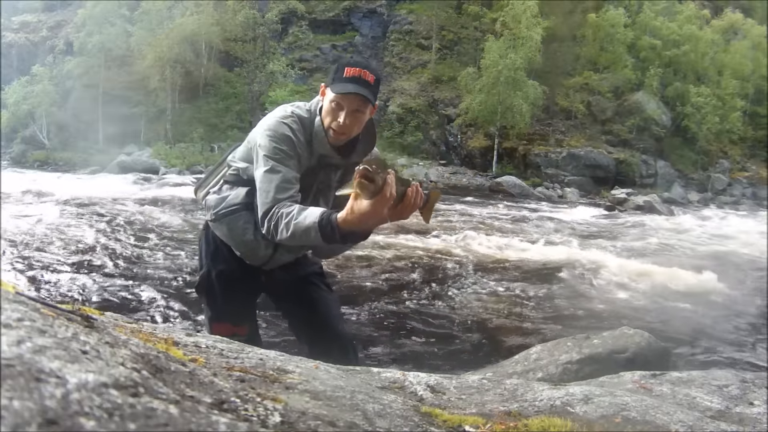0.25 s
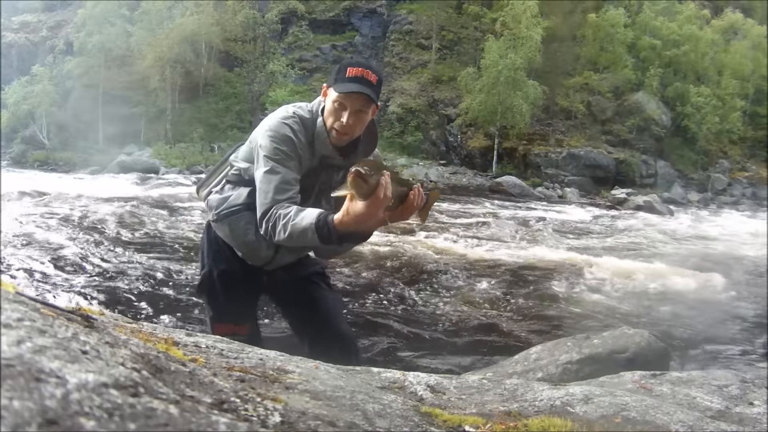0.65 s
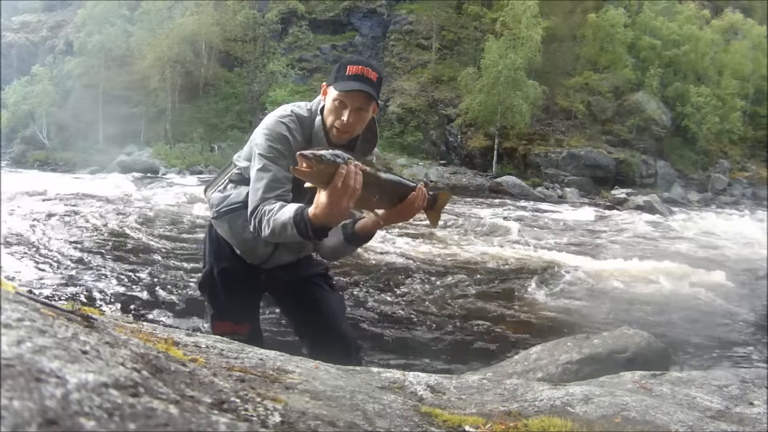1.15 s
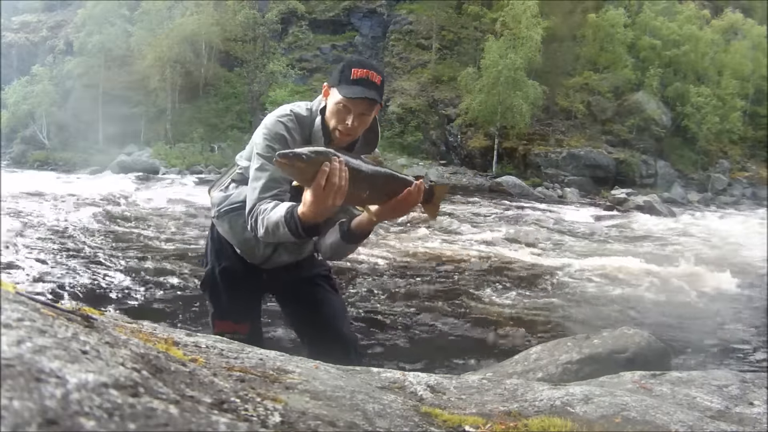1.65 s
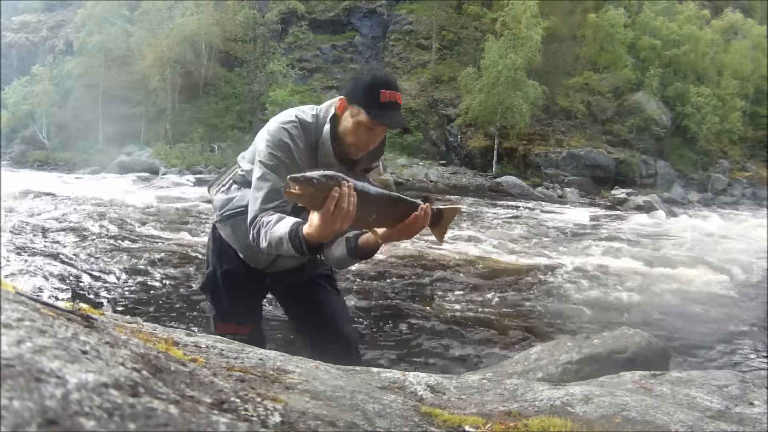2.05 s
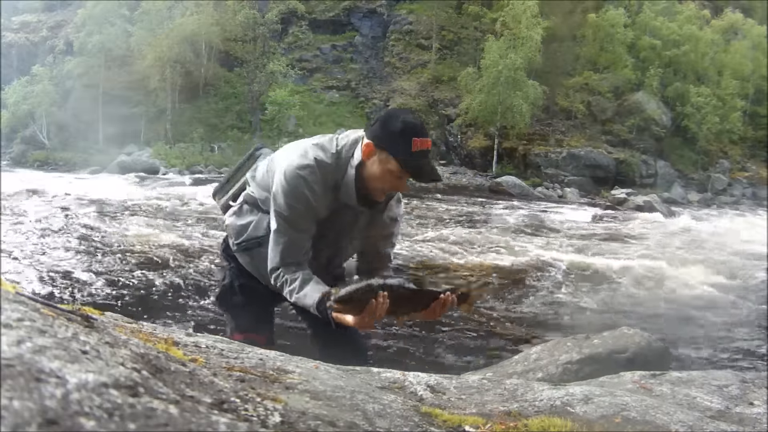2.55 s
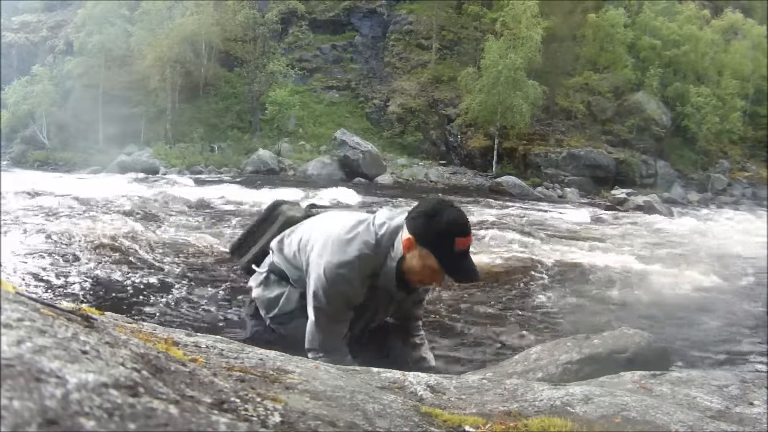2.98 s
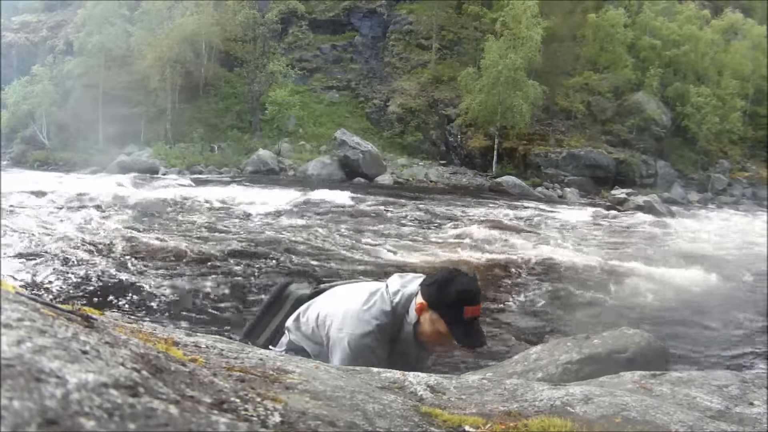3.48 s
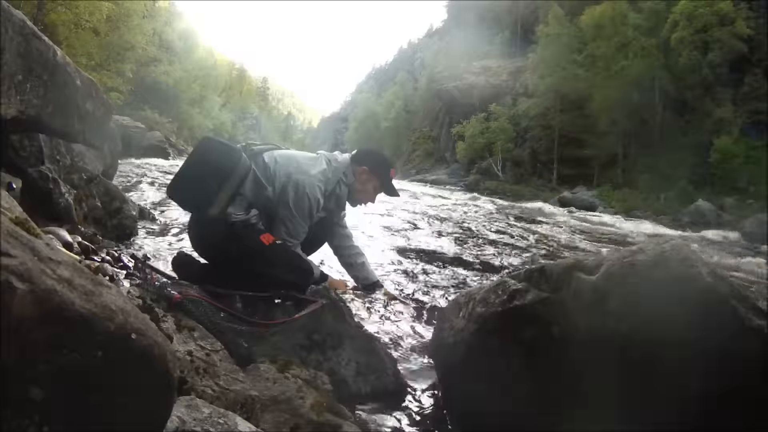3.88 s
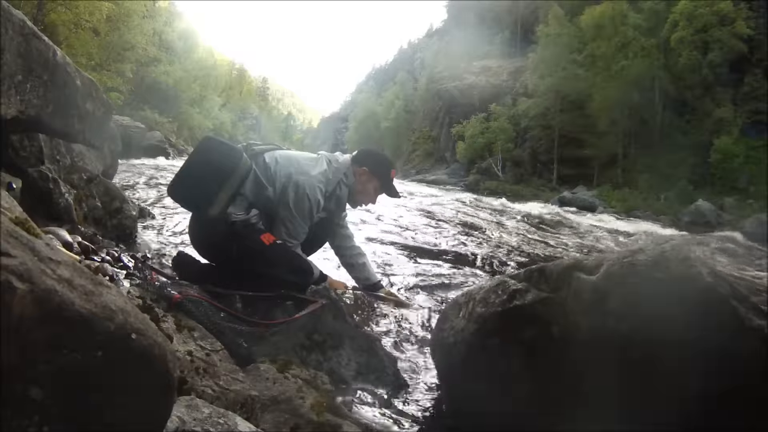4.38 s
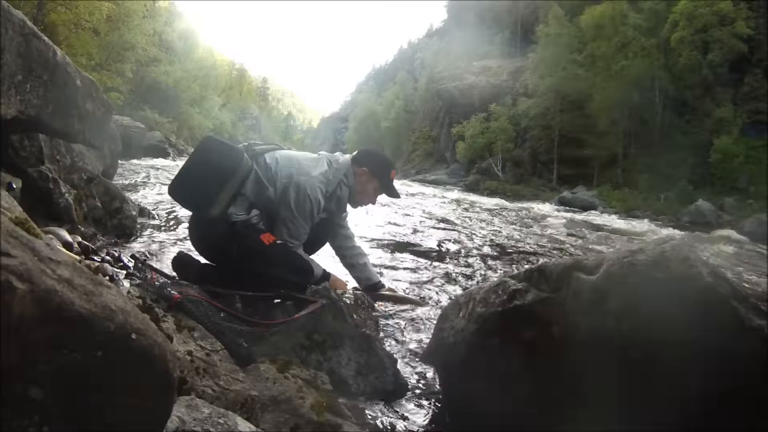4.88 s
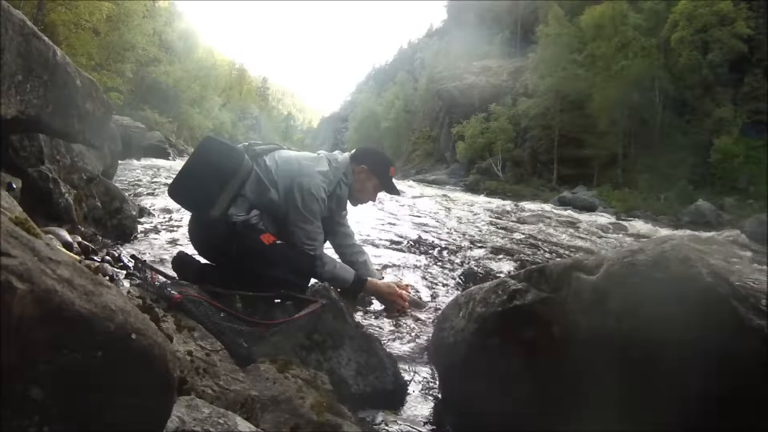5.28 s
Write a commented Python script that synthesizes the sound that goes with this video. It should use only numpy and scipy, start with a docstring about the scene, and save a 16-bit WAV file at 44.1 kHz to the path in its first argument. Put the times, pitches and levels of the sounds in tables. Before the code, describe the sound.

River rapids roar with bubbling gurgles and bright foam hiss, fade steadily to a brief silence, then a smoother rush fades back in.

```python
"""River rapids from two spots

River rapids in a rocky gorge, heard from an open slab on the bank, then from a gap between boulders.
Noise bands that swell on their own make the roar of bubble clouds, and short rising sines make the
gurgles of single bubbles; noise with random impulses makes the hiss and crackle of bursting foam.
The first spot fades evenly to silence and the second fades in; the sound is all but mono."""
import sys
import numpy as np
from scipy import signal
from scipy.fft import rfft, irfft
from scipy.io import wavfile

SR = 44100
rng = np.random.default_rng(int(sys.argv[2]) if len(sys.argv) > 2 else 0)


def waveform_to_disk(signal):
    """Save audio, clipped to [-1, 1], as 16-bit WAV at the path in sys.argv[1]."""
    frames = np.transpose(np.atleast_2d(signal))
    scaled = np.clip(frames, -1, 1) * 32767
    samples = np.round(scaled).astype(np.int16)
    wavfile.write(sys.argv[1], SR, samples)


N = 243873
TIME = np.arange(N) / SR
HZ = np.maximum(np.arange(N // 2 + 1) * SR / N, 1)  # frequency of each spectral bin


def from_db(db):
    """Decibels to gain."""
    return 10 ** (np.asarray(db) / 20)


def rms_one(x):
    """Scale to unit rms."""
    return x / np.sqrt(np.mean(x ** 2) + 1e-20)


def colour(points, peaks=()):
    """Gain at every frequency: a drawn spectrum with steep skirts and a few resonances."""
    hz, db = np.transpose(points)
    octaves_below = np.maximum(np.log2(hz[0] / HZ), 0)
    octaves_above = np.maximum(np.log2(HZ / hz[-1]), 0)
    level = np.interp(np.log(HZ), np.log(hz), db)
    level = level - 48 * (octaves_below + octaves_above)  # skirts in dB per octave
    for centre, width, boost in peaks:
        level = level + boost / (1 + (2 * (HZ - centre) / width) ** 2)
    return from_db(level)


def shaped(x, gain):
    """Filter by a gain per frequency; rms 1."""
    return rms_one(irfft(rfft(x) * gain, N))


def drift(rate):
    """Slow chance with about this many turns a second: noise through two equal poles; spread 1."""
    step, settle = 40, 2000  # audio samples per drift value; drift values dropped at the start
    pole = np.exp(-2 * np.pi * rate * step / SR)
    noise = rng.standard_normal(N // step + settle + 2)
    slow = signal.lfilter([1], [1, -2 * pole, pole * pole], noise)[settle:]
    return np.interp(np.arange(N) / step, np.arange(len(slow)), rms_one(slow))


def surge():
    """Slow swell of the white water, as a gain: a steady current that wanders only a little."""
    surge_db, surges_per_s = 0.15, 2.0
    return from_db(surge_db * drift(surges_per_s))


def side_hiss():
    """Faint high hiss that differs between left and right, giving the foam a trace of width."""
    # relative noise density of the side signal: (f/Hz, level/dB)
    width_spectrum = [(4500, -21), (8500, -11), (10500, 7.5), (12500, 4.5), (15000, 2.5)]
    return from_db(-81.5) * shaped(rng.standard_normal(N), colour(width_spectrum))


def foam(spectrum, peaks, bursts_per_s, crackle, flicker_db):
    """Countless tiny bursts merge into a hiss; the nearest stand out as fine crackle."""
    born = rng.random(N) < bursts_per_s / SR
    bursts = rms_one(born * rng.standard_normal(N))
    flicker = from_db(flicker_db * drift(35))
    fizz = (rng.standard_normal(N) + crackle * bursts) * flicker
    return shaped(fizz, colour(spectrum, peaks))


def gurgle(per_s, low_hz, high_hz, cycles, rise, spread_db, count=3000):
    """Single bubbles ring for some cycles and rise in pitch as they near the surface."""
    out = np.zeros(N)
    bubbles = rng.random((count, 4))
    released = bubbles[:, 3] < per_s * N / SR / count
    for when, smallness, nearness, _ in bubbles[released]:
        hz = low_hz * (high_hz / low_hz) ** smallness
        start = int(when * N)
        length = min(int(cycles / hz * SR), N - start)
        age = np.arange(length) * hz / (cycles * SR)  # share of its life
        phase = 2 * np.pi * cycles * (age + rise * age ** 2 / 2)
        decay = np.exp(-np.log(1000) * age)  # 60 dB over a life
        swell = 1 - np.exp(-cycles * age)  # builds up within a cycle or two
        strength = from_db(spread_db * nearness) * (low_hz / hz) ** 0.29  # small ones are weaker
        out[start:start + length] += np.sin(phase) * decay * swell * strength
    return rms_one(out)


def roar(spectrum, peaks, churn_db, churn_rate, count=9):
    """Bubble clouds of every size: each band swells and sinks on its own as the water tumbles."""
    edges = np.geomspace(110, 2800, count)  # band edges in Hz
    low_pass = signal.butter(2, edges[0], fs=SR, output="sos")
    water = signal.sosfilt(low_pass, rng.standard_normal(N))  # steady rumble under the clouds
    for pair in zip(edges, edges[1:]):
        band_pass = signal.butter(2, pair, "band", fs=SR, output="sos")
        cloud = signal.sosfilt(band_pass, rng.standard_normal(N))
        water += cloud * from_db(churn_db * drift(churn_rate))
    return shaped(water, colour(spectrum, peaks))


def boulder_gap():
    """The rocks screen off most of the hiss and leave a smoother rush."""
    # relative noise density of the white water, then of the foam: (f/Hz, level/dB)
    roar_spectrum = [(25, -34), (50, -19), (100, -9.5), (170, -3.5), (240, 0), (340, 2), (480, -1.5),
                     (700, 1.4), (950, 0.2), (1550, -2), (2000, -6.5), (2250, -10), (2600, -27)]
    foam_spectrum = [(2300, 4), (2700, 4), (3200, 0.5), (4500, -0.5), (6300, -1.5), (7200, -5.5),
                     (8600, -7.5), (9100, -9.5), (10500, -14.5), (12000, -15.5), (15300, -17.5)]
    # narrow resonances that colour roar and foam: (f/Hz, width/Hz, boost/dB)
    resonances = [(3980, 200, 2.6), (5270, 200, 1.2), (6100, 200, 1.5), (9800, 500, 2.2)]
    hiss = from_db(-56.5) * foam(foam_spectrum, resonances, bursts_per_s=1700, crackle=0.35, flicker_db=0.0)
    water = from_db(-38.5) * roar(roar_spectrum, resonances, churn_db=1.1, churn_rate=26)
    water += from_db(-56.5) * gurgle(per_s=120, low_hz=277, high_hz=1850, cycles=18, rise=0.066, spread_db=23)
    return water * surge() + hiss


def open_slab():
    """Close to the breaking wave: a full roar, clear gurgles and bright foam."""
    # relative noise density of the white water, then of the foam: (f/Hz, level/dB)
    roar_spectrum = [(25, -32.5), (50, -19.5), (100, -12), (160, -6.5), (240, -1), (305, -3), (400, -0.5),
                     (570, 0.5), (720, -1.5), (930, -4), (1350, -2.5), (1650, -8), (2100, -11), (2600, -24)]
    foam_spectrum = [(2300, 0), (2700, 0.5), (3100, -2), (3700, 0.5), (4400, -1.5), (4900, -3),
                     (5400, -2.5), (5800, -7.5), (6700, -6), (7200, -9.5), (8600, -12), (9100, -15),
                     (10500, -17.5), (15300, -22.5)]
    # narrow resonances that colour roar and foam: (f/Hz, width/Hz, boost/dB)
    resonances = [(1386, 120, 0), (1930, 100, 3), (3990, 360, 5.5), (4410, 130, 5), (6040, 230, 4.5),
                  (9600, 550, 2)]
    hiss = from_db(-51.0) * foam(foam_spectrum, resonances, bursts_per_s=2200, crackle=0.33, flicker_db=0.25)
    water = from_db(-37.5) * roar(roar_spectrum, resonances, churn_db=1.0, churn_rate=25)
    water += from_db(-47.0) * gurgle(per_s=170, low_hz=346.8, high_hz=1693, cycles=46, rise=0.076,
                                     spread_db=14.5)
    return water * surge() + hiss


def ramp(zero_s, full_s):
    """A fader's gain: a straight line between silence at one moment and full level at another."""
    return np.clip((TIME - zero_s) / (full_s - zero_s), 0, 1)


def scene():
    """One spot fades out, a short silence, the other fades in; the side hiss follows both faders."""
    fade_end_s, silent_from_s, mute_ramp_s = 3.705, 3.665, 0.025
    silent_to_s, fade_in_s = 3.76, 1.8
    mute = ramp(silent_from_s, silent_from_s - mute_ramp_s)  # closes just before the long fade ends
    fade_out = ramp(fade_end_s, 0) * mute
    fade_in = ramp(silent_to_s, silent_to_s + fade_in_s)
    mid = fade_out * open_slab() + fade_in * boulder_gap()
    side = (fade_out + fade_in) * side_hiss()
    return np.array([mid + side, mid - side])


def record(dry):
    """The top is cut steeply by an elliptic low-pass at 15250 Hz."""
    low_pass = signal.ellip(12, 0.1, 70, 15250, fs=SR, output="sos")  # ripple and stopband in dB
    return signal.sosfilt(low_pass, dry)


dry = scene()
out = record(dry)
waveform_to_disk(out)
```